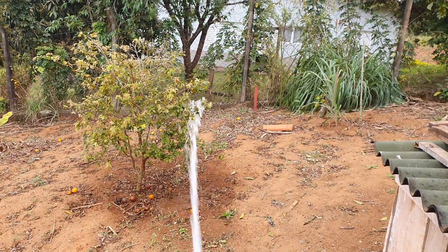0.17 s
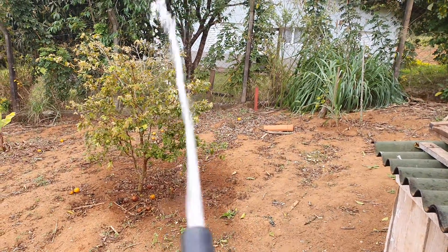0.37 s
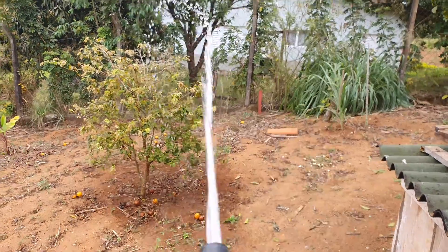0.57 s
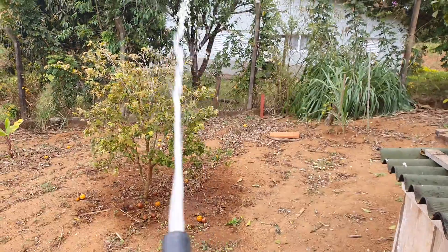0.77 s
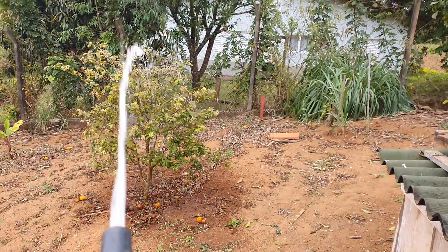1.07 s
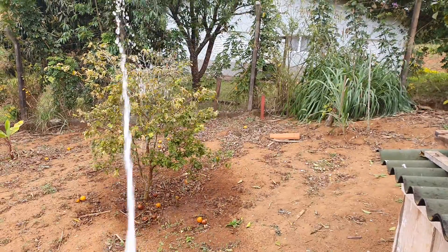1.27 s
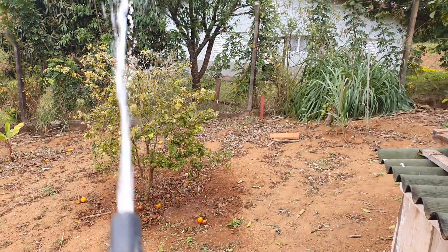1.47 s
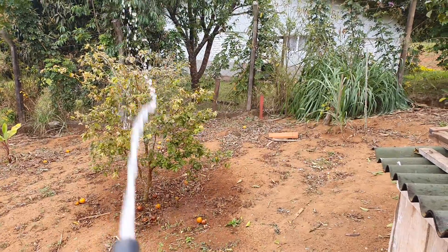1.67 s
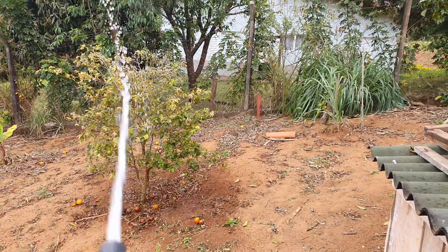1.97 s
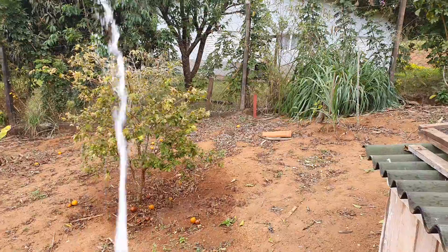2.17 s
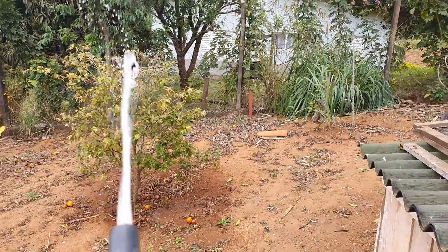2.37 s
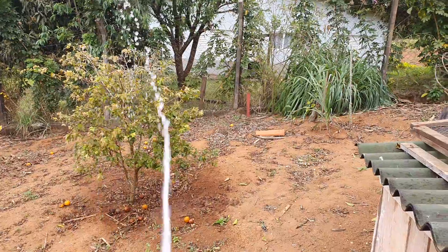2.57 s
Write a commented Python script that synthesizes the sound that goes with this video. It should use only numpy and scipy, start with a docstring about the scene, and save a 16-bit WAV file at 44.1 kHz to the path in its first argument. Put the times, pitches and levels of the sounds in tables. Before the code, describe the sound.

A garden hose sprays close to the microphone in a yard, fizzing and spattering on soil and leaves. A pump hums low throughout, a distant rooster crows, other fowl twitter faintly, and wind briefly bumps the microphone.

```python
"""In a yard, a garden hose throws a jet close to a microphone with two ports. The jet fizzes at the
nozzle and spatters on soil and leaves: each droplet is a briefly damped oscillation, their mass is a
hiss, and big drops burst as puffs of noise. A pump drones low at harmonics of its shaft rate.
A far rooster crows and other fowl twitter faintly, both with the reverberation of fences and trees,
while a gust rumbles and bumps the microphone."""
import sys
import numpy as np
from scipy import signal
from scipy.fft import rfft, irfft, next_fast_len
from scipy.io import wavfile
from scipy.ndimage import uniform_filter1d, map_coordinates

SR = 44100
rng = np.random.default_rng(int(sys.argv[2]) if len(sys.argv) > 2 else 0)


def digitize_waveform(pressure):
    """Quantize a signal to 16-bit integers and store it at the path in sys.argv[1].

    Rows of a 2-D input are taken as channels; values are limited to [-1, 1].
    """
    field = np.atleast_2d(pressure).T
    bounded = np.clip(field, -1, 1)
    quanta = np.round(bounded * 32767).astype(np.int16)
    wavfile.write(sys.argv[1], SR, quanta)


N = 119511
T = np.arange(N) / SR

# Envelopes of the nozzle fizz and of the falling water: t/s, relative level/dB
FIZZ_ENVELOPE = [(0.0, -62), (0.1, -65.5), (0.22, -61.5), (0.54, -60.5), (0.57, -61), (0.91, -65),
                 (1.17, -62.5), (1.21, -65), (1.42, -60.5), (1.69, -66.5), (1.71, -57.5), (1.95, -65),
                 (2.06, -58.5), (2.16, -64), (2.41, -61), (2.41, -52.5), (2.44, -64.5), (2.71, -62)]
SPATTER_ENVELOPE = [(0.0, -64.5), (0.07, -57.5), (0.08, -61.5), (0.7, -58.5), (0.81, -64), (1.0, -57.5),
                    (1.24, -62.5), (1.28, -60.5), (1.71, -61.5), (1.99, -63), (2.02, -60), (2.29, -68.5),
                    (2.3, -61), (2.6, -67), (2.64, -60.5), (2.71, -62.5)]
# Spectral weighting of the same two sounds: f/Hz, gain/dB
FIZZ_SPECTRUM = [(3000, -21), (5500, 1.5), (7000, -1), (10000, -2), (13000, -1), (16000, -1.5)]
SPATTER_SPECTRUM = [(150, 8), (300, 1), (450, -5.5), (800, -1.5), (3000, -1), (5000, -1.5), (7000, -5.5),
                    (10000, -6), (16000, -27)]
# Bursts of big drops: t/s, relative level/dB, centre f/Hz
BIG_DROPS = [(0.06, -36, 1800), (0.15, -35, 11100), (0.161, -37, 2600), (0.2415, -35, 7000),
             (0.268, -39, 3500), (0.4753, -32.5, 2420), (0.5435, -35.5, 3000), (0.5865, -35, 1980),
             (0.679, -38, 1730), (0.834, -37.5, 6400), (0.933, -40, 6250), (0.9883, -33.5, 2430),
             (1.025, -34.5, 12000), (1.2839, -39, 1766), (1.6335, -34.5, 9200), (1.8075, -34, 9200),
             (1.8894, -32.5, 6220), (2.012, -32, 4940), (2.0598, -35, 10100), (2.102, -33.5, 5640),
             (2.3062, -42, 1920), (2.415, -36, 9800), (2.4683, -43, 9000), (2.6314, -38.5, 3540)]
# Wandering narrow band of the jet: t/s, centre f/Hz, level/dB
SWISH_BAND = [(0.0, 8800, -66), (0.13, 9900, -86), (0.2, 9700, -62), (0.28, 8950, -62.5),
              (0.45, 9900, -63.5), (0.7, 9300, -63.5), (0.91, 8700, -63), (1.4, 9500, -63),
              (1.66, 8600, -68), (1.72, 9100, -61.5), (1.84, 10000, -71), (1.96, 9700, -62),
              (2.07, 9100, -56.5), (2.19, 9400, -73), (2.71, 8700, -61)]
# Arrival-time difference as the water swings across: t/s, lead of the left port/ms
WATER_LEAD = [(0, 0.11), (.25, 0.13), (.53, .1), (.83, 0.15), (1.3, 0.15), (1.45, 0.24), (1.75, .23),
              (1.9, 0.18), (2.05, 0.24), (2.7, 0.2)]
# Harmonics of the pump: multiple of the shaft rate, relative level/dB
PUMP_ORDERS = [(2, -6), (3, 2), (4, -1.5), (5, -3), (6, -9.5), (7, -14.5), (8, -28)]
# Wavering of the hum: t/s, then relative level/dB of orders 3, 4 and 5
ORDER_ENVELOPES = [(0.0, -55, -58, -51.5), (0.44, -46, -51, -53), (0.69, -52, -49, -57),
                   (1.19, -46.5, -58, -61.5), (1.26, -46.5, -45, -73), (1.38, -52, -54, -54.5),
                   (1.75, -53, -53, -55), (1.9, -50, -68, -51), (1.99, -57, -47, -68),
                   (2.54, -49.5, -55, -54), (2.71, -68.5, -65, -57)]
# Spectral weighting of the wind rumble: f/Hz, gain/dB
RUMBLE_SPECTRUM = [(20, -17), (32, -10), (45, -1.5), (80, 0), (130, -6), (190, -23.5), (300, -31),
                   (450, -42.5)]
# Envelope of the rumble: t/s, relative level/dB
GUST_ENVELOPE = [(0.0, -69), (0.13, -73.5), (1.56, -71.5), (1.83, -63.5), (1.93, -71), (2.05, -63.5),
                 (2.14, -68.5), (2.41, -87), (2.71, -73)]
# Pressure pulses on the microphone: t/s, peak level/dB, f/Hz
WIND_BUMPS = [(1.989, -36, 58.7), (2.028, -29.5, 110)]
# Rooster's opening syllables: t/s, duration/s, top f/Hz, level/dB, subharmonic re the tone/dB
ROOSTER_SYLLABLES = [(0.193, 0.13, 1385, -58, -16), (0.285, 0.14, 1380, -51, -16),
                     (0.5, 0.095, 1488, -59.5, -13.5), (0.584, 0.1014, 1504, -54, -13.5),
                     (0.682, 0.06, 1466, -63, -9)]
# Long crow: t/s, f/Hz, level/dB, subharmonic level/dB, hoarseness (0-1)
CROW_CONTOUR = [(0.751, 1364, -73, -77, 0.19), (0.758, 1418, -55.5, -64, 0.1), (0.808, 1460, -53, -65, 0.3),
                (1.047, 1433, -58.5, -68.5, 0.51), (1.129, 1407, -48, -67.5, 0.1),
                (1.154, 1391, -63, -87, 0.22), (1.166, 1396, -57.5, -67, 0.2), (1.188, 1403, -55, -80, 0),
                (1.286, 1409, -54, -77, 0.29), (1.448, 1421, -55, -70.5, 0.12), (1.542, 1408, -50, -77, 0),
                (1.58, 1388, -64, -85, 0), (1.645, 1398, -45.5, -66.5, 0), (1.739, 1377, -53.5, -60, 0.18),
                (1.774, 1393, -60, -79, 0.1), (1.82, 1360, -53.5, -66, 0.06), (1.861, 1352, -69, -64, 0.24),
                (1.9, 1341, -57.5, -70, 0.23), (1.93, 1340, -78, -74, 0.77), (2.1, 1354, -72.5, -99, 0.8)]
# Notes of other fowl: t/s, duration/s, top f/Hz, level/dB, fractional sag of pitch at the ends
FOWL_NOTES = [(0.604, 0.19, 995, -69, 0.03), (0.832, 0.26, 2586, -72, 0.05),
              (1.759, 0.5, 3199, -66.5, 0.05), (2.342, 0.091, 3170, -63.5, 0.3)]
# Response of the right port relative to the left: f/Hz, gain/dB
RIGHT_PORT_RESPONSE = [(60, 0.1), (1000, 2), (2400, 4), (3700, -1.5), (5500, 0.5), (6800, -4.5),
                       (7400, -28), (8000, -4), (8450, 0.5), (9100, 0), (10400, 2.5), (12200, 0.5),
                       (13400, -2), (14300, 0), (15300, 11), (16000, 2)]


def nozzle_fizz():
    """Superposition: thousands of tiny, high droplet pulses merge with hiss into a fizz."""
    drops = droplets(count=6000, centre_hz=9740, octaves=0.63, cycles=3.3, spread_db=1)
    hiss = spray_hiss(patchy_db=5.0, common_gain=1.1)
    return water(drops, hiss, FIZZ_ENVELOPE, FIZZ_SPECTRUM, drop_share=0.59, swell_db=1.0)


def spatter():
    """Impact noise: drops on soil and leaves are heavily damped, so their spectrum is broad."""
    drops = droplets(count=4000, centre_hz=3290, octaves=1.46, cycles=1.53, spread_db=2.5)
    hiss = spray_hiss(patchy_db=1.5, common_gain=1.2)
    return water(drops, hiss, SPATTER_ENVELOPE, SPATTER_SPECTRUM, drop_share=0.13, swell_db=1.15)


def water(drops, hiss, envelope, spectrum, drop_share, swell_db):
    """Incoherent addition: drops and hiss sum in power, then share one spectrum and envelope."""
    mix = np.sqrt(drop_share) * drops + np.sqrt(1 - drop_share) * hiss
    swell = amp(swell_db * (wobble(24.82) + 0.76 * wobble(90)))
    return amp(curves(envelope)[0]) * unit(swell * filtered(mix, lambda f: gain_at(spectrum, f)))


def droplets(count, centre_hz, octaves, cycles, spread_db):
    """Damped oscillation: each drop rings for a few cycles, at a random time and from its own side."""
    when, pitch, strength = rng.random((count, 3)).T
    start_s = when * N / SR
    hz = np.clip(centre_hz * 2 ** (octaves * (2 * pitch - 1)), 500, SR / 2.6)
    size = amp(-spread_db * np.log(strength + 0.013)) * np.sqrt(hz)
    scatter_ms, pan_db = (rng.standard_normal((count, 2)) * [0.051, 5.5]).T
    lead_s = (np.interp(start_s, *np.transpose(WATER_LEAD)) + scatter_ms) / 1000
    samples, out = np.arange(160), []
    for side in (1, -1):  # left, right
        arrival_s = start_s - side * lead_s / 2 + 0.001
        age_s = np.clip(samples / SR - (arrival_s % (1 / SR))[:, None], 0, 1)
        turns = age_s * hz[:, None]
        ring = np.sin(2 * np.pi * turns) * turns * np.exp(-3 * turns / cycles)
        wave = (size * amp(side * pan_db))[:, None] * ring
        index = (arrival_s * SR).astype(int).clip(0)[:, None] + samples
        out.append(np.bincount(index.ravel(), wave.ravel(), N + SR)[:N])
    return unit(np.array(out))


def spray_hiss(patchy_db, common_gain):
    """Random modulation: noise swells in patches of time and frequency, partly common to both ports."""
    spectra = signal.stft(rng.standard_normal((3, N)), nperseg=256)[2]
    patches = rng.standard_normal(spectra.shape[1:])
    for axis in (0, 1):
        patches = uniform_filter1d(patches, size=8, axis=axis)
    hiss = signal.istft(spectra * amp(patchy_db * unit(patches)), nperseg=256)[1][:, :N]
    return unit(common_gain * swing(hiss[0]) + hiss[1:])


def splats(t60_s=0.011, rise_s=0.0007, width_hz=4200, spray_loss_db=4.5):
    """Transient noise: a big drop bursts in a band-limited puff that decays exponentially."""
    out, t = np.zeros((3, N + SR)), np.arange(1024) / SR
    f = np.fft.rfftfreq(len(t), 1 / SR)
    for start_s, db, hz in BIG_DROPS:
        band = np.exp(-((f - hz) / width_hz) ** 2) * (f > 600)
        puff = unit(irfft(rfft(rng.standard_normal((3, len(t)))) * band))
        envelope = amp(db - spray_loss_db - 60 * t / t60_s) * (1 - np.exp(-t / rise_s))
        first = round(start_s * SR)
        out[:, first:first + len(t)] += envelope * puff
    return swing(out[0, :N]) + 0.6 * out[1:, :N]  # common part plus each port's own


def jet_swish(half_width_hz=600, spit_db=5, spits_per_s=220):
    """Narrow-band noise: slow noise modulates a carrier whose frequency moves with the nozzle."""
    hz, db = curves(SWISH_BAND)
    slow = filtered(rng.standard_normal((2, 3, N)), lambda f: 1 / (1 + (f / half_width_hz) ** 4))
    phase = phase_of(hz)
    band = slow[0] * np.cos(phase) + slow[1] * np.sin(phase)
    flutter = amp(spit_db * wobble(spits_per_s) + 1.5 * wobble(25.3))
    return amp(db) * unit(flutter * (1.1 * swing(band[0]) + band[1:]))


def pump(shaft_hz=24.85, level_db=-46.5, waver_db=2.5):
    """Periodic forcing: a shaft radiates harmonics of its rate, each wavering in level and phase."""
    shaft_phase = phase_of(shaft_hz * (1 + 0.0014 * wobble(1.61)))
    drift_db = {order: db - db.mean() for order, db in zip((3, 4, 5), curves(ORDER_ENVELOPES))}
    out = 0
    for order, db in PUMP_ORDERS:
        port_phase = np.array([[0.17], [-0.17]]) * (1 + wobble(4.9))
        level = amp(db + drift_db.get(order, 0) + waver_db * wobble(6.15))
        out += level * np.sin(order * shaft_phase + 0.96 * wobble(3.375) + port_phase)
    return amp(level_db) * unit(out)


def gust(coherence=0.6):
    """Pressure fluctuation: moving air gives a partly coherent rumble at the ports and two soft bumps."""
    noise = filtered(rng.standard_normal((3, N)), lambda f: gain_at(RUMBLE_SPECTRUM, f))
    rumble = np.sqrt(coherence) * noise[0] + np.sqrt(1 - coherence) * noise[1:]
    out = amp(curves(GUST_ENVELOPE)[0] + 20) * unit(rumble)
    for centre_s, db, hz in WIND_BUMPS:
        turns = (T - centre_s) * hz
        bump = amp(db) * np.cos(2 * np.pi * turns) * np.exp(-(turns / 0.76) ** 2)
        out += bump * amp([[1.2], [-1.2]])
    return out


def rooster(edge_s=0.0064):
    """Frequency modulation: the pitch arches in each short syllable, then sags through a long crow."""
    syllables = 0
    for start_s, length_s, hz, db, sub_db in ROOSTER_SYLLABLES:
        level = amp(db) * window(start_s, length_s, edge_s)
        pitch = hz * arch(start_s, length_s, sag=0.075)
        syllables += rooster_voice(pitch, level, level * amp(sub_db), hoarse=0.17)
    hz, db, sub_db, hoarse = curves(CROW_CONTOUR)
    start_s, end_s = CROW_CONTOUR[0][0], CROW_CONTOUR[-1][0]
    gate = window(start_s, end_s - start_s, edge_s)
    crow = rooster_voice(hz, gate * amp(db), gate * amp(sub_db), hoarse)
    return yard(syllables + crow, lead_s=0.00015, echo_db=-8) * amp([[2.2], [-2.2]])


def rooster_voice(hz, level, sub_level, hoarse):
    """Jitter and shimmer: hoarseness shakes a whistle-like tone and its subharmonic an octave down."""
    phase = phase_of(hz * (1 + 0.029 * hoarse * wobble(90)))
    shimmer = 1 + hoarse * wobble(120)
    return np.sqrt(2) * shimmer * (level * np.sin(phase) + sub_level * np.sin(phase / 2))


def fowl():
    """Amplitude modulation: faint notes, each arched in pitch, flutter at random."""
    out = 0
    for start_s, length_s, hz, db, sag in FOWL_NOTES:
        pitch = hz * (arch(start_s, length_s, sag) + 0.017 * wobble(60))
        flutter = 0.93 + wobble(140)
        out += amp(db) * flutter * window(start_s, length_s, edge_s=0.024) * np.sin(phase_of(pitch))
    return yard(out, lead_s=0.00011, echo_db=-1.5)


def yard(x, lead_s, echo_db, t60_s=0.45):
    """Reverberation: fences and trees add a diffuse tail to direct sound that arrives left port first."""
    t = np.arange(SR // 2) / SR
    tail = rng.standard_normal((2, len(t))) * amp(-60 * t / t60_s) * (t > 0.006)
    diffuse = signal.fftconvolve(x[None], tail / np.linalg.norm(tail[0]), axes=1)[:, :N]
    direct = filtered(x, lambda f: np.exp(1j * np.pi * f * lead_s * np.array([[1], [-1]])))
    return direct + amp(echo_db) * diffuse


def swing(x):
    """Path difference: the moving water reaches the left port first, by a lead that varies in time."""
    hz, t, spectra = signal.stft(x, SR, nperseg=256)
    lead_s = np.interp(t, *np.transpose(WATER_LEAD)) / 1000
    shift = np.pi * hz[:, None] * lead_s
    return signal.istft(spectra * np.exp(1j * np.array([shift, -shift])), SR, nperseg=256)[1][:, :N]


def amp(db):
    """Amplitude ratio of a level in decibels."""
    return 10 ** (np.asarray(db) / 20)


def unit(x):
    """Normalisation to unit mean square."""
    return x / np.sqrt(np.mean(x ** 2) + 1e-20)


def gain_at(spectrum, hz):
    """Amplitude gain, interpolated in decibels on a logarithmic frequency axis."""
    f, db = np.transpose(spectrum)
    return amp(np.interp(np.log(hz + 1), np.log(f + 1), db))


def curves(rows):
    """Linear interpolation: one value per sample for each column after the time."""
    times, *columns = np.transpose(rows)
    return [np.interp(T, times, column) for column in columns]


def wobble(knots_per_s):
    """Smooth random modulation: a spline through Gaussian values."""
    return map_coordinates(rng.standard_normal(int(N * knots_per_s / SR) + 4), [T * knots_per_s])


def phase_of(hz):
    """Phase in radians, the time integral of angular frequency."""
    return 2 * np.pi * np.cumsum(hz) / SR


def arch(start_s, length_s, sag):
    """Parabolic pitch ratio: 1 in mid-note, lower by sag at both ends."""
    return 1 - sag * np.clip(2 * (T - start_s) / length_s - 1, -1, 1) ** 2


def window(start_s, length_s, edge_s):
    """Gate with a quadratic rise and fall."""
    return np.clip(np.minimum(T - start_s, start_s + length_s - T) / edge_s, 0, 1) ** 2


def filtered(x, response):
    """Linear filtering: the spectrum is multiplied by a complex frequency response."""
    size = next_fast_len(N + SR // 2)
    return irfft(rfft(x, size) * response(np.fft.rfftfreq(size, 1 / SR)), size)[..., :N]


def scene():
    """Superposition: the pressures of all sources add at each port."""
    hose = amp(6.0) * nozzle_fizz() + amp(4.5) * spatter() + splats() + jet_swish()
    return hose + pump() + gust() + rooster() + fowl()


def record(dry, band_limit_hz=15830):
    """Cavity resonance colours the treble at the right port; neither port passes sound above the limit."""
    def response(hz):
        return np.array([np.ones_like(hz), gain_at(RIGHT_PORT_RESPONSE, hz)]) * (hz < band_limit_hz)
    return filtered(dry, response)


dry = scene()
out = record(dry)
digitize_waveform(out)
```